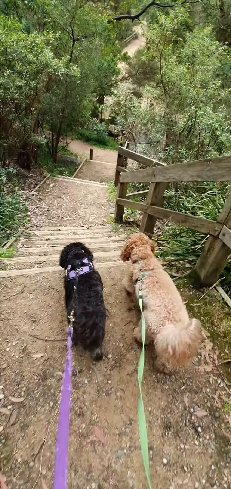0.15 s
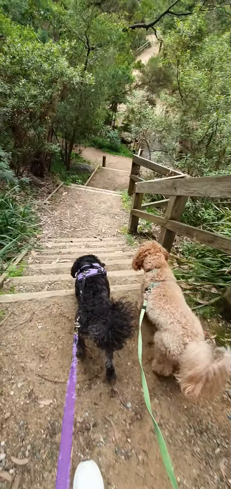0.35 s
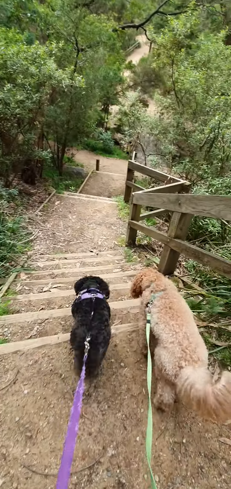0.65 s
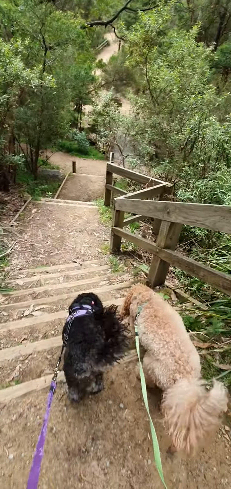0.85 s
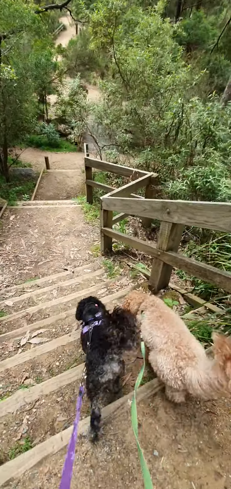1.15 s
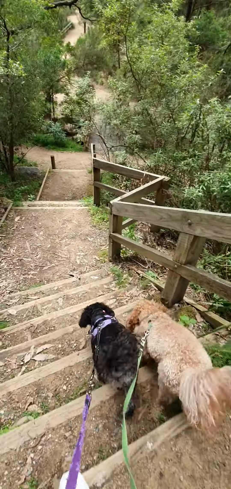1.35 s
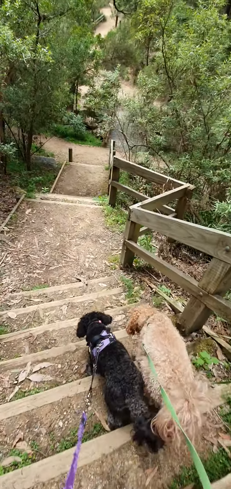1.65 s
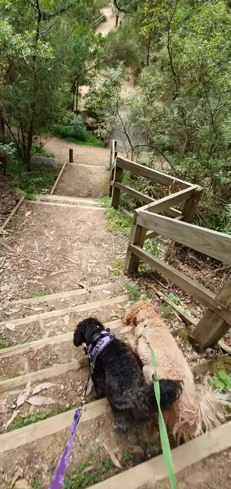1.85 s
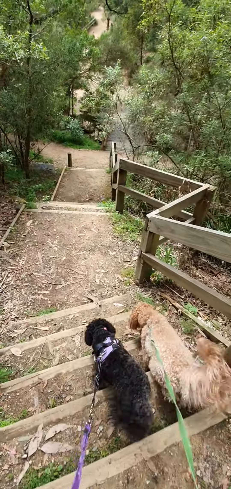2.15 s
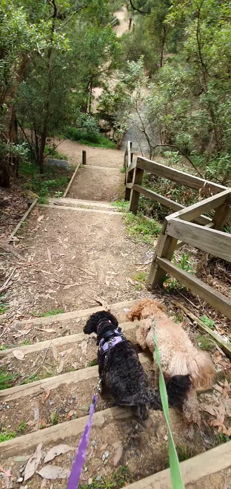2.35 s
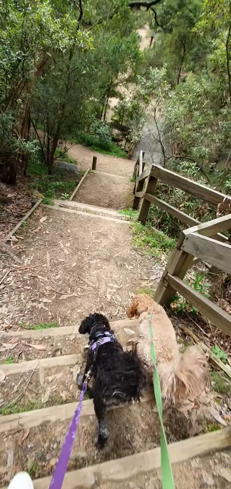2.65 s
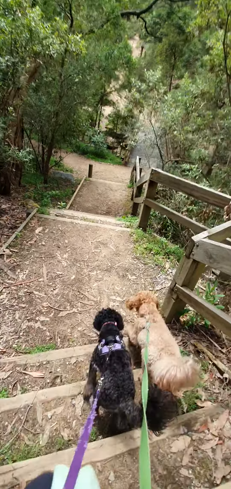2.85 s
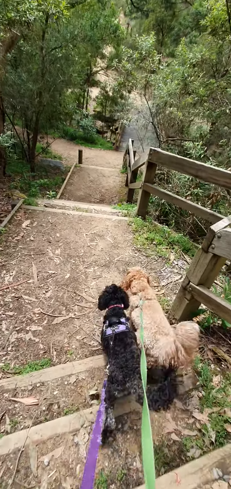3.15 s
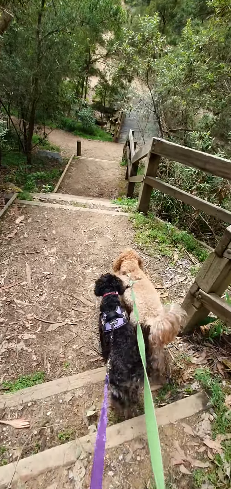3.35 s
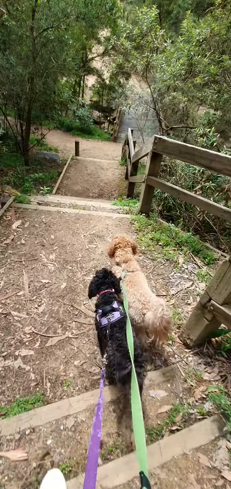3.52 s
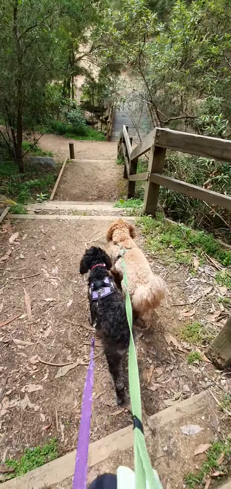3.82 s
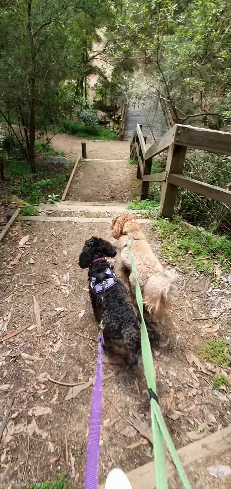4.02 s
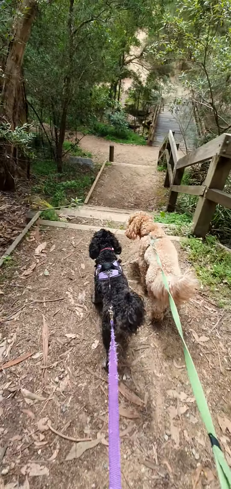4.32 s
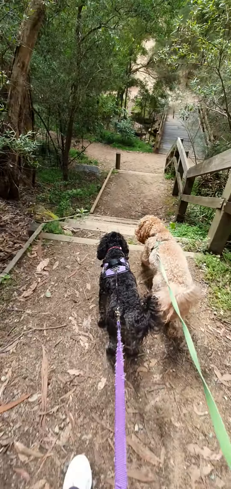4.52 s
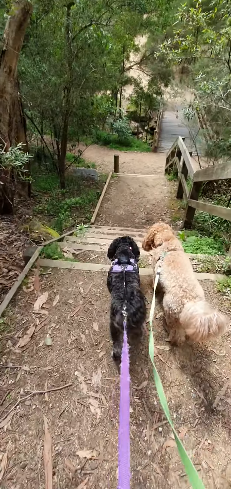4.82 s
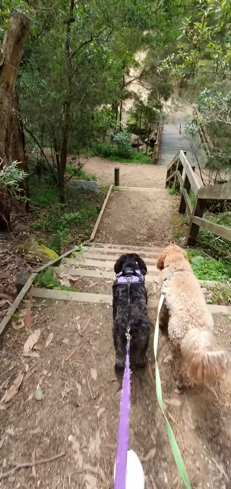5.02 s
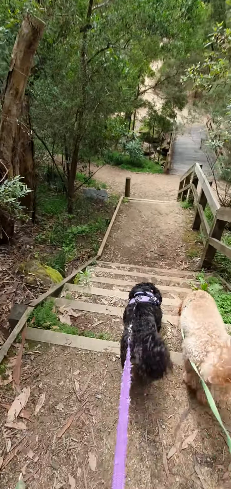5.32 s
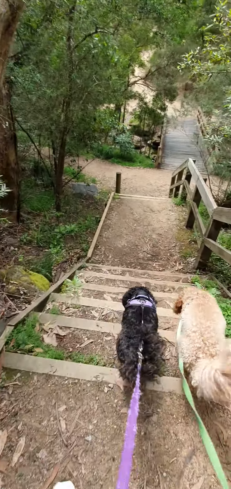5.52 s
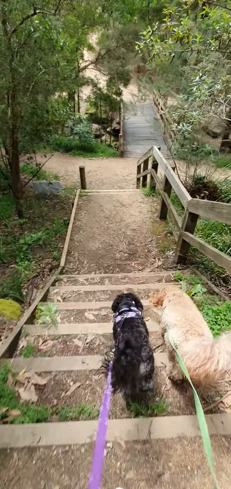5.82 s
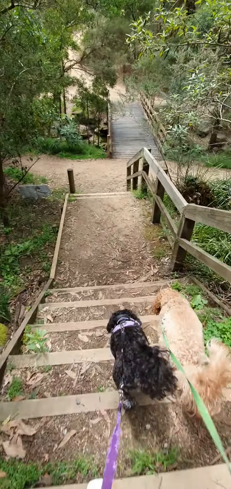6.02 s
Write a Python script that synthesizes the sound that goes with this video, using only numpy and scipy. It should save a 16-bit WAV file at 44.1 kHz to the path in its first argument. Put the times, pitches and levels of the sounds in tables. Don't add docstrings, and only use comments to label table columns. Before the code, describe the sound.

A quiet, open bush hush with light low wind buffeting a handheld stereo microphone, stronger on the right at the start, near 1 s and between 1.5 and 2.2 s. A stone clicks at once; a gritty step crunches at 0.45 s, then loud stone clicks rattle at 0.75-0.8 s and more gravel ticks until 1.5 s. Dull timber thumps fall around 1.9, 2.35, 2.75, 3.15, 3.6 and 4.1 s, with scuffs, paw patter, leaf rustle and dry snaps. Hollow lead-clip knocks cluster from 2.4 to 3.4 s; a sharp stone crack lands at 3.27 s. Softer steps follow at 4.6, 5.15, 5.6 and 6.05 s. Collar tags ring thinly and faintly, near 0.6, 0.9 and 3.45 s. Small birds whistle fast upward glides and high pips throughout, slightly reedy at 1.25 s, echoing briefly among trees.

```python
import sys
import numpy as np
from scipy import signal
from scipy.fft import rfft, irfft, next_fast_len
from scipy.io import wavfile
from scipy.ndimage import uniform_filter1d, map_coordinates

SR = 44100
rng = np.random.default_rng(int(sys.argv[2]) if len(sys.argv) > 2 else 0)


def log_audio(samples):
    frames = np.atleast_2d(samples).T
    limited = np.clip(frames, -1, 1)
    pcm = np.round(limited * 32767).astype(np.int16)
    wavfile.write(sys.argv[1], SR, pcm)


def boost_factor(decibels):
    exponent = np.asarray(decibels, float) / 20
    return 10 ** exponent


N = 272097

# frequency in Hz, level in dB per Hz.
AIR_COLOUR = [(71, 2), (120, 0.5), (150, -5), (272, -3), (1210, -20.5), (2530, -24.5), (5870, -42),
              (7350, -43), (8480, -26.5), (14200, -75), (16000, -60)]
# frequency in Hz, likeness from 0 to 1.
EAR_LIKENESS = [(200, 1), (800, 0.81), (2300, 0.044), (6000, 0.013), (15000, 0.014)]
# frequency in Hz, time to fade by 60 dB in seconds.
TREE_FADE = [(300, .25), (2500, 1.0), (4300, 1.5), (6000, .9), (8000, .6), (14000, .35)]

# frequency in Hz, level in dB per Hz.
WIND_COLOUR = [(20, -55), (35, -8.5), (65, 4.5), (95, -2), (130, -19), (200, -46), (400, -36), (900, -67)]
# time in seconds, level in dB.
BREEZE_LEVEL = [(0, -40), (.3, -50.5), (1.2, -53), (1.8, -48), (2.9, -51.5), (3.6, -56), (4.1, -46),
                (5, -54.5), (5.6, -51), (6.17, -53)]
# peak in seconds, level in dB, half length in seconds,
# flutter in dB against the rumble.
WINDWARD_PUFFS = [(.045, -21.5, 0.015, -4), (.115, -26.5, 0.02, -3), (.17, -24, 0.019, -21),
                  (.62, -40, 0.086, -15), (.99, -17.5, 0.009, -24), (1.022, -18.5, 0.024, -6.5),
                  (1.2, -39, 0.27, -13), (1.47, -27.5, 0.052, -15.5), (1.535, -24, 0.018, -16),
                  (1.63, -30, 0.021, -18), (1.77, -36.5, 0.016, -13), (1.92, -29, 0.03, -10),
                  (2.035, -25.5, 0.059, -15.5), (2.17, -29.5, 0.048, -20.5), (2.69, -36, 0.12, -13.5),
                  (2.8, -29, 0.009, -33), (2.95, -34, 0.08, -11.5), (3.07, -24.5, 0.032, -27),
                  (3.25, -38.5, 0.12, -19), (3.86, -42, 0.071, -38), (4.3, -43, 0.073, -22),
                  (4.815, -24.5, 0.038, -23), (5.3, -60, 0.16, -12), (5.765, -32, 0.023, -29)]
SHELTERED_PUFFS = [(.15, -64, 0.066, -23), (1.41, -38.5, 0.076, -39), (1.54, -48, 0.032, -17),
                   (1.95, -66, 0.073, -6), (2.38, -38, 0.01, 2.5), (2.8, -43, 0.058, -25),
                   (3.21, -43.5, 0.16, -27), (4.28, -32, 0.021, -7.5), (5.76, -45, 0.017, -10)]

# start in seconds, pitch in Hz, level in
# dB, time to fade by 60 dB in seconds.
LINGERING_NOTES = [(.16, 4200, -61, 1.0), (.762, 4145, -57, 0.98), (1.3, 4080, -56, 0.81),
                   (1.45, 4650, -61, 0.97), (1.79, 4960, -62, 1.2), (2.118, 4075, -61, .8),
                   (2.445, 4800, -64, 0.54), (2.538, 4300, -60, .7), (3.138, 4350, -58, .8),
                   (3.425, 1535, -58, .25), (3.769, 4170, -59, 1), (3.912, 1560, -55, 0.16),
                   (4.483, 4250, -59, 0.88), (4.975, 3640, -67, 0.73), (4.965, 2600, -66, 0.83),
                   (5.163, 4220, -73, 0.71), (5.145, 3380, -67, .6), (5.82, 4310, -72, .6),
                   (1.3, 3800, -67, .6), (1.66, 3760, -55, 0.76), (1.885, 3520, -65, .4), (4.47, 3130, -66, .8)]

# start in seconds, length in seconds, start pitch in Hz, overtone level in dB,
# fundamental in dB against the overtone.
BIRD_GLIDES = [(0.1, 0.045, 2420, -50, -5.5), (0.651, 0.041, 2625, -55.5, -15),
               (0.696, 0.045, 2306, -50, -9), (1.305, 0.053, 2570, -58.5, -5),
               (1.747, 0.046, 2094, -57.5, -1.5), (1.855, 0.042, 2710, -53.5, -13),
               (2.067, 0.04, 2403, -56.5, -4.5), (2.388, 0.038, 2503, -57, -4),
               (2.481, 0.037, 2546, -56, -1.5), (3.08, 0.043, 2360, -50.5, -7),
               (3.712, 0.022, 2210, -53, -7.5), (4.425, 0.039, 2310, -53, -8.5),
               (4.929, 0.039, 1920, -64, -0.5), (5.101, 0.048, 2350, -55.5, -7.5),
               (5.758, 0.044, 2480, -54, -7), (6.079, 0.022, 2240, -61.5, -7)]
# start in seconds, start pitch in Hz, level in dB.
BIRD_PIPS = [(.146, 4112, -54.5), (0.749, 3980, -56), (2.105, 3980, -55), (2.432, 4710, -60),
             (2.524, 4200, -48.5), (3.124, 4197, -50), (3.684, 3430, -67), (4.469, 4040, -56),
             (4.962, 3490, -59.5), (5.15, 4200, -56), (5.808, 4260, -61), (6.111, 3690, -65.5)]
# start in seconds, length in seconds, start pitch in Hz,
# end pitch in Hz, level in dB.
SECOND_BIRD = [(1.174, 0.035, 2540, 2990, -62), (1.217, 0.02, 2220, 2534, -58.5),
               (2.495, 0.04, 4300, 5250, -63), (1.601, 0.032, 2125, 2570, -58),
               (1.63, 0.021, 3440, 3590, -62), (1.639, 0.041, 3740, 3970, -63.5),
               (1.749, 0.014, 4750, 4840, -67), (1.774, 0.019, 2970, 3000, -71),
               (4.807, 0.019, 2620, 2440, -76), (2.716, 0.021, 2290, 2780, -62),
               (3.03, 0.056, 5160, 5150, -75), (3.665, 0.044, 2190, 2540, -70.5),
               (3.74, 0.027, 3610, 4300, -53.5)]
REEDY_BIRD = [
    (1.241, 0.0233, 2560, 2995, -56),
    (1.26, 0.0417, 3694, 4080, -59),
]

# start in seconds, peak in dB, upper tones in dB.
COLLAR_TAGS = [(0.2349, -69, 17), (0.617, -43, -14), (0.937, -47, -6), (2.295, -52, 3), (2.603, -53, 9),
               (2.951, -55.5, 15), (3.2545, -57, -8), (3.45, -43, -13), (4.788, -52, -20), (5.493, -67, 11),
               (3.395, -53, -5),
    (4.374, -68, 14),
    (4.86, -59, -18),
]
# pitch in Hz, time to fade by 60 dB in seconds.
TAG_TONES = [(6024, .28), (7050, .035), (10800, .1)]

# start in seconds, peak in dB, pitch in Hz.
STONE_CLICKS = [(.0044, -19.5, 2230), (.4065, -38, 1850), (.434, -28, 2400), (.466, -33, 1610),
                (.612, -43, 2200), (.685, -39, 1990), (.747, -15, 2250), (0.7735, -13.5, 2080),
                (0.7917, -16.5, 2185), (.7984, -25, 2070), (0.9126, -28.5, 2130), (.941, -37, 2120),
                (.991, -27, 2200), (1.398, -26.5, 2430), (4.642, -65, 1930), (5.862, -39, 2870),
                (1.07, -25, 1940), (1.24, -28, 2230), (1.274, -25, 1890), (1.3062, -32.5, 2040),
                (1.3303, -29, 2230), (1.4787, -28, 1880), (2.002, -32, 1770), (2.161, -33, 1750),
                (2.764, -32, 2470), (2.806, -32, 2170), (3.822, -38, 2540), (3.8977, -38, 2300),
                (5.53, -33, 2850), (5.6116, -27.5, 2320), (5.6236, -32, 1870), (5.6531, -43, 1900),
                (6.0525, -29, 2390),
                (.4115, -33, 1880), (.4195, -35, 2470), (.426, -30, 2570), (0.4407, -35, 2400),
                (.4985, -41, 2620), (.9625, -37, 2200), (.968, -39, 2150), (.9725, -35, 1950),
                (.9815, -36, 1950), (1.0055, -38, 1900), (1.056, -35, 2100), (1.064, -41, 2030),
                (1.0815, -33, 1950), (1.156, -38, 2090), (1.391, -28, 2090), (1.419, -29, 2100),
                (1.488, -27, 2250), (3.257, -32, 1870), (3.2703, -20.5, 2150), (3.281, -33, 1910),
                (3.32, -35, 2250), (4.617, -29, 1700), (4.6385, -37, 1680), (5.641, -38, 2200),
                (5.654, -33, 2300), (5.671, -40, 2290), (5.7547, -41, 2840), (6.09, -40, 2200)]
# start in seconds, peak in dB.
DRY_SNAPS = [(0.4673, -39), (0.9133, -47), (0.932, -25), (1.07, -28), (1.242, -28), (1.638, -45),
             (1.665, -44), (1.788, -24), (1.831, -29), (2.225, -49), (2.2967, -33), (2.3265, -28),
             (2.375, -22), (2.6045, -46), (2.952, -21), (2.976, -24), (2.996, -18), (3.64, -22),
             (3.808, -23), (3.98, -29), (4.3755, -35), (5.5184, -20.5), (5.586, -21),
             (1.101, -32),
    (2.748, -40),
    (4.143, -36),
]

# start in seconds, peak in dB,
# clack in dB, crack in dB.
LEAD_AND_TWIG_KNOCKS = [(2.416, -40, -17, -22), (2.44, -35.5, 4, -21), (2.57, -30, 9.5, 13), (2.889, -35, 3, 3),
                        (3.093, -23, 3.5, 5.5), (3.251, -41, -22, -22), (3.267, -41, 9.5, -20),
                        (3.333, -27, 11.5, 16), (3.384, -32.5, 2.5, -1), (3.704, -44, -10, -4),
                        (4.612, -41.5, 8.5, 10), (5.624, -43.5, 5, 5),
                        (3.246, -45, -10, -20),
    (4.5885, -50, 4, 9),
    (4.6045, -43.5, 6, 10),
    (3.821, -64, 8, 16),
]

# start in seconds, peak in dB, pitch in Hz, upper ring in dB.
TIMBER_THUDS = [(0.453, -43.5, 391, 11.5), (1.894, -30.5, 289, -5.5), (2.353, -26.5, 302, -0.5),
                (2.746, -28, 374.5, -11.5), (3.159, -33, 213, 3), (3.605, -35, 266, -1),
                (4.097, -29.5, 306, 1.5), (5.114, -48, 231, -4), (0.999, -37, 255, -13),
                (5.627, -52, 333, -8), (6.016, -42, 430, -19)]
# start in seconds, peak in dB, pitch in
# Hz.
EARTH_THUDS = [(0.109, -43, 292), (0.502, -42, 328), (0.949, -41.5, 385), (0.98, -54, 282),
               (1.374, -45, 626), (4.588, -45, 338), (4.665, -48.5, 452), (5.705, -51.5, 377),
               (5.86, -70, 487), (6.039, -42.5, 710),
               (4.6, -53, 526), (5.631, -48, 420), (5.674, -50, 520), (6.029, -49, 520)]

# time in seconds, level in dB.
PAW_PATTER = [(0, -58), (.31, -59.5), (.55, -62.5), (1.36, -58.5), (1.74, -61), (2.87, -64.5),
              (3.28, -58.5), (3.42, -66.5), (4.62, -64.5), (5.5, -68), (5.67, -57.5), (6.17, -73)]
# peak in seconds, length in seconds, level in dB, gravel in dB
SCUFFED_STEPS = [(-0.01, 0.017, -59, 27), (0.449, 0.053, -50.5, 0.5), (0.961, 0.063, -54.5, 3.5),
                 (1.406, 0.036, -55, -2.5), (1.486, 0.042, -70, 24), (1.999, 0.082, -62.5, -3),
                 (2.175, 0.073, -61, -2), (2.413, 0.084, -56, -7), (2.49, 0.022, -57.5, 6),
                 (2.788, 0.13, -56.5, -3), (3.107, 0.008, -56.5, -24), (3.26, 0.031, -54, -7),
                 (3.396, 0.046, -61, -9), (3.732, 0.16, -62.5, -6), (4.199, 0.12, -61.5, -6),
                 (4.604, 0.019, -50.5, -7.5), (5.159, 0.043, -58.5, -4), (5.627, 0.025, -53.5, -2),
                 (6.046, 0.028, -58.5, -10), (6.102, 0.12, -69, 22),
                 (4.642, 0.051, -58.5, -5),
]
# peak in seconds, length in seconds, level in dB.
LEAF_RUSTLES = [(-0.005, 0.027, -57), (0.48, 0.036, -64.5), (1.068, 0.016, -67), (1.478, 0.027, -62),
                (1.645, 0.028, -61.5), (2.588, 0.068, -61.5), (2.967, 0.041, -64), (3.116, 0.03, -58),
                (3.407, 0.072, -66.5), (3.757, 0.16, -67), (5.173, 0.065, -73), (5.596, 0.041, -65.5),
                (6.144, 0.069, -67),
                (3.244, 0.1, -64.5),
    (3.805, 0.015, -58),
]
# frequency in Hz, level in dB per Hz.
EARTH_COLOUR = [(70, -17), (150, 2), (280, -0.5), (500, -2), (800, -1), (1100, -2), (2500, -25.5)]
GRAVEL_COLOUR = [(500, 0.5), (1000, -9), (1500, 3.5), (2300, 1.5), (3500, -5), (5000, -6.5), (8000, -24),
                 (16000, -59)]
STONE_COLOUR = [(1400, -19.5), (2100, 1), (2800, -5), (3800, -22.5)]
LEAF_COLOUR = [(2500, -1), (4500, 6.5), (6500, 6.5), (7500, 6.5), (9000, 3.5), (13000, -0.5), (15000, -13),
               (15900, -7), (16300, -70)]

AIR_DB, AIR_SWAY_DB = -56.5, 1.5
PUFF_SHAPE, BREEZE_FLUTTER_DB = 1.61, -44
BEAT_RATE, STEADY_LINE = 130, .7
CLIMB_HZ_PER_S, LEVEL_OFF = 24000, .2
PIP_S, PIP_RISE, PIP_SECOND_DB = 0.014, 1.03, -13.5
GLIDE_SWELL_DB, PIP_SWELL_DB = 11, -6
THIRD_DB, FOURTH_DB, FLICKER_DB = -19, -23, 5
NEARER_FROM_S, FAR_UPPER_DB, NEAR_UPPER_DB = 3, -8, 3
REEDY_SECOND_DB = -2.5
REEDY_THIRD_DB, REEDY_FOURTH_DB = -6, -4
VOICE_TOP_HZ = 12500
GLIDE_ECHO_DB, PIP_ECHO_DB, STIR_DB = -2.5, -17, 3
NEAR_LEAVES_DB = -7
TICK_PAN_DB = -5
CLOD_UPPER_DB = -1.5
GRAVEL_DB, GRAVEL_GROWS = -5.5, 2.01
LEAF_DB, LEAF_GROWS = -9, 1.44
STONE_DB = -9
RISE_SHARE, FALL_SHARE = 0.61, 1.066
STEP_LEAF_DB, RUSTLE_GRAVEL_DB = -18.5, -5
PORT_DIP_HZ, PORT_DIP_WIDTH_HZ, PORT_DIP_DB = 7390, 350, -4.5
TOP_HZ, TOP_STEEPNESS = 15750, 60


def unit(x):
    return x / np.sqrt(np.mean(x ** 2) + 1e-20)


def along(points, hz):
    f, v = np.transpose(points)
    return np.interp(np.log(hz + 1), np.log(f + 1), v)


def curves(rows):
    s, *cols = np.transpose(rows)
    return [np.interp(np.arange(N) / SR, s, c) for c in cols]


def wobble(rate):
    knots = rng.standard_normal(int(N * rate / SR) + 4)
    return map_coordinates(knots, [np.arange(N) * rate / SR])


def filtered(x, response):
    m = next_fast_len(N + 8192)
    return irfft(rfft(x, m) * response(np.fft.rfftfreq(m, 1 / SR)), m)[..., :N]


def late(pair, lag_ms):
    lags = np.array([[lag_ms], [0]]) / 1000
    return filtered(pair, lambda hz: np.exp(-2j * np.pi * hz * lags))


def spread(pair, colour, lag_ms):
    def mid_and_side(hz):
        turn = np.arccos(np.clip(along(EAR_LIKENESS, hz), 0, 1)) / 2
        return boost_factor(along(colour, hz)) * [np.cos(turn), np.sin(turn)]

    mid, side = filtered(pair, mid_and_side)
    return unit(late(np.array([mid + side, mid - side]), lag_ms))


def add(out, s, sound, pan_db):
    i = round(s * SR)
    out[:, i:i + len(sound)] += sound * boost_factor([[pan_db / 2], [-pan_db / 2]])


def ring(t, hz, t60, attack):
    return -np.sin(2 * np.pi * hz * t) * boost_factor(-60 * t / t60) * (1 - np.exp(-t / attack))


def swell(peak, rise, fall, shape):
    t = np.arange(0, N + 64, 64) / SR - peak
    bump = np.exp(-np.abs(t / np.where(t < 0, rise, fall)) ** shape)
    return np.interp(np.arange(N) / SR - peak, t, bump)


def echoes(x, t60_scale, size):
    out, step = np.zeros((2, N + 2 * SR)), SR // 3
    for i in range(0, N, step):
        hz, t, z = signal.stft(rng.standard_normal((2, size)), SR, nperseg=256)
        fade = boost_factor(-60 * t / (t60_scale * along(TREE_FADE, hz)[:, None]))
        tail = signal.istft(z * fade, SR, nperseg=256)[1]
        wet = signal.fftconvolve(x[None, i:i + step], tail / np.linalg.norm(tail[0]), axes=1)
        out[:, i:i + wet.shape[1]] += wet
    return out[:, :N]


def quiet_air():
    level = boost_factor(AIR_DB + AIR_SWAY_DB * wobble(3.183))
    return level * spread(rng.standard_normal((2, N)), AIR_COLOUR, lag_ms=0.19)


def port(puffs):
    gains = boost_factor(curves(BREEZE_LEVEL)[0]) * boost_factor([[0], [BREEZE_FLUTTER_DB]])
    for peak, db, half, flutter_db in puffs:
        gains = gains + boost_factor([[db], [db + flutter_db]]) * swell(peak, half, half, PUFF_SHAPE)
    return gains


def wind():
    gains = np.array([port(SHELTERED_PUFFS), port(WINDWARD_PUFFS)])
    noise = rng.standard_normal((2, 2, N))
    low = filtered(noise[0], lambda hz: boost_factor(along(WIND_COLOUR, hz)))
    low = unit(low / np.sqrt(np.abs(uniform_filter1d(low ** 2, size=SR // 18)) + 1e-9))
    lumps = boost_factor(3.2 * np.array([wobble(26), wobble(24.12)]))
    flap = unit(lumps * filtered(noise[1], lambda hz: boost_factor(along(WIND_COLOUR, hz / 2.144))))
    return gains[:, 0] * low + gains[:, 1] * boost_factor(1.0) * flap


def linger():
    out, t = np.zeros((2, N)), np.arange(N) / SR
    beat = STEADY_LINE + np.array([wobble(BEAT_RATE) + 1j * wobble(BEAT_RATE) for _ in range(2)])
    for s, hz, db, t60 in LINGERING_NOTES:
        a, b = round(s * SR), round((s + t60) * SR)
        u = t[a:b] - s
        fade = boost_factor(db - 60 * u / t60) * (1 - np.exp(-u / 0.0035))
        out[:, a:b] += fade * np.real(beat[:, a:b] * np.exp(2j * np.pi * hz * u))
    return late(out, 0.414)


def whistles(calls, swell_db, attack_s, third_db=THIRD_DB, fourth_db=FOURTH_DB, far_db=FAR_UPPER_DB):
    out = np.zeros((2, 2, N + SR))
    for start, end, start_hz, end_hz, first_db, second_db in calls:
        t = np.arange(round((end - start) * SR)) / SR
        u = t / t[-1]
        pitch = start_hz + (end_hz - start_hz) * (u + LEVEL_OFF * u * (1 - u * u))
        phase = 2 * np.pi * np.cumsum(pitch) / SR
        shape = np.sqrt(2) * np.clip(t / attack_s, 0, 1) * np.clip((t[-1] - t) / 0.00037, 0, 1)
        first = boost_factor(first_db + swell_db * (u - .5)) * shape * np.sin(phase)
        add(out[0], start, first, 3.5)
        upper_db = NEAR_UPPER_DB if start > NEARER_FROM_S else far_db
        third_fourth = boost_factor(third_db) * np.sin(3 * phase) + boost_factor(fourth_db) * np.sin(4 * phase)
        upper = np.sin(2 * phase) + boost_factor(upper_db) * np.clip(2 * u, 0, 1) * third_fourth
        add(out[1], start, boost_factor(second_db - 26 * (u - .45) ** 2) * shape * upper, -4.5)
    flicker = boost_factor(FLICKER_DB * np.array([[wobble(140), wobble(140)], [wobble(140), wobble(140)]]))
    return (flicker * out[..., :N]).sum(0)


def birds():
    glide_calls = [(s, s + n, hz, hz + CLIMB_HZ_PER_S * n, db + first_db, db)
                   for s, n, hz, db, first_db in BIRD_GLIDES]
    glides = whistles(glide_calls, swell_db=GLIDE_SWELL_DB, attack_s=0.0055)

    short = [(s, PIP_S, hz, PIP_RISE * hz, db) for s, hz, db in BIRD_PIPS] + SECOND_BIRD
    pip_calls = [(s, s + n, hz, end_hz, db, db + PIP_SECOND_DB) for s, n, hz, end_hz, db in short]
    pips = whistles(pip_calls, swell_db=PIP_SWELL_DB, attack_s=0.0012)

    reedy_calls = [(s, s + n, hz, end_hz, db, db + REEDY_SECOND_DB)
                   for s, n, hz, end_hz, db in REEDY_BIRD]
    reedy = whistles(reedy_calls, swell_db=-4, attack_s=0.0024,
                     third_db=REEDY_THIRD_DB, fourth_db=REEDY_FOURTH_DB, far_db=1.5)

    voices = np.array([reedy, glides])
    reedy, glides = filtered(voices, lambda hz: 1 / (1 + (hz / VOICE_TOP_HZ) ** 16))
    direct = glides + pips + reedy
    sent = boost_factor(GLIDE_ECHO_DB) * (glides + reedy) + boost_factor(PIP_ECHO_DB) * pips
    stir = boost_factor(STIR_DB * np.array([wobble(220), wobble(220)]))
    leaves = boost_factor(NEAR_LEAVES_DB) * echoes(direct.mean(0), t60_scale=0.32, size=SR // 5)
    far_trees = echoes(sent.mean(0), t60_scale=0.67, size=3 * SR // 4)
    return direct + stir * (leaves + far_trees)


def tags():
    out, t = np.zeros((2, N + SR)), np.arange(SR // 3) / SR
    for s, db, upper_db in COLLAR_TAGS:
        gains = boost_factor([0, upper_db, upper_db - 19])
        disc = sum(g * ring(t, hz, t60, t60 * 0.026) for g, (hz, t60) in zip(gains, TAG_TONES))
        add(out, s, boost_factor(db) * disc, -3)
    return late(out[:, :N], .42)


def ticks():
    out, t = np.zeros((2, N + SR)), np.arange(SR // 50) / SR
    thin = signal.butter(2, [6000, 13000], "band", fs=SR)
    for s, db, hz in STONE_CLICKS:
        click = ring(t, hz, 0.0029, 0.00086) + 0.052 * ring(t, hz * 1.06, 0.033, 0.0048)
        add(out, s, boost_factor(db + 8.0) * click, TICK_PAN_DB)
    for s, db in DRY_SNAPS:
        snap = signal.lfilter(*thin, rng.standard_normal(len(t))) * boost_factor(-3.5 - 60 * t / 0.0049)
        add(out, s, boost_factor(db - 14) * snap, rng.normal(0, 3))
    return late(out[:, :N], 0.41)


def knocks():
    out, t = np.zeros((2, N + SR)), np.arange(SR // 16) / SR
    edge = signal.butter(1, [2500, 9000], "band", fs=SR)
    for s, db, clack_db, crack_db in LEAD_AND_TWIG_KNOCKS:
        u = rng.standard_normal(5)
        body = ring(t, 720 * (1 + .04 * u[0]), .012, .004)
        clack = sum(boost_factor(0.28 * v - hz / 700) * ring(t, hz, 0.0026, 0.00062)
                    for hz, v in zip((1460, 1770, 2350, 4300), u[1:]))
        crack = signal.lfilter(*edge, rng.standard_normal(len(t)))
        crack = crack * boost_factor(-60 * t / .016) * (1 - np.exp(-t / .0005))
        add(out, s, boost_factor(db + 23.5) * body, -4)
        hard = boost_factor(db + 13.0 + clack_db) * clack + boost_factor(db + crack_db - 12.5) * crack
        add(out, s + 0.00082, hard, -6)
    return late(out[:, :N], 0.48)


def thuds():
    out, t = np.zeros((2, N + SR)), np.arange(SR // 16) / SR
    soft = [(s, db, hz, CLOD_UPPER_DB) for s, db, hz in EARTH_THUDS]
    for s, db, hz, upper_db in TIMBER_THUDS + soft:
        push = ring(t, hz, .016, .002) + boost_factor(upper_db - 12) * ring(t, 2.1 * hz, .035, .003)
        add(out, s + 0.00296, boost_factor(db + 13.5) * push, -2.2)
    return late(out[:, :N], 0.28)


def grains(rate, scatter_db, smooth):
    hit = rng.random((2, N)) < rate / SR
    size = boost_factor(scatter_db * np.minimum(rng.exponential(size=(2, N)), 4)) * rng.standard_normal((2, N))
    z = signal.stft(unit(hit * size) + smooth * rng.standard_normal((2, N)), nperseg=128)[2]
    patches = uniform_filter1d(rng.standard_normal(z.shape[1:]), size=2, axis=0)
    patches = uniform_filter1d(patches, size=3, axis=1)
    return signal.istft(z * boost_factor(3.5 * unit(patches)), nperseg=128)[1][:, :N]


def scuff(peak, length, db):
    return boost_factor(db)[:, None] * swell(peak, RISE_SHARE * length, FALL_SHARE * length, 2.2)


def grit():
    patter_db, = curves(PAW_PATTER)
    mean_db = patter_db.mean()
    swing_db = patter_db - mean_db
    gravel_db = GRAVEL_DB + GRAVEL_GROWS * swing_db
    leaf_db = LEAF_DB + LEAF_GROWS * swing_db
    level = boost_factor(mean_db + np.array([swing_db, gravel_db, leaf_db]))
    for peak, length, db, stony_db in SCUFFED_STEPS:
        level = level + scuff(peak, length, [db - stony_db / 2, db + stony_db / 2, db + STEP_LEAF_DB])
    for peak, length, db in LEAF_RUSTLES:
        level[1:] += scuff(peak, length, [db + RUSTLE_GRAVEL_DB, db])

    clumps = wobble(70)
    earth = spread(grains(1200, scatter_db=2.4, smooth=.5), EARTH_COLOUR, lag_ms=.32)
    earth = boost_factor(2.8 * clumps) * earth
    gravel = spread(grains(1800, scatter_db=3, smooth=.5), GRAVEL_COLOUR, lag_ms=.36)
    gravel = boost_factor(2 + 1.2 * clumps + 1.5 * wobble(50)) * gravel
    stones = spread(grains(350, scatter_db=3, smooth=.2), STONE_COLOUR, lag_ms=.4)
    gravel = gravel + boost_factor(STONE_DB) * stones
    leaves = spread(grains(3000, scatter_db=2.2, smooth=.8), LEAF_COLOUR, lag_ms=.4)
    leaves = boost_factor(2 + 1.5 * wobble(40) + clumps) * leaves
    return (level[0] * earth + level[1] * gravel + level[2] * leaves) * boost_factor([[-.8], [.8]])


def scene():
    background = quiet_air() + wind() + linger() + birds()
    hits = ticks() + knocks() + thuds()
    near = boost_factor(-11.0) * echoes(hits[1], t60_scale=0.028, size=SR // 8)
    return background + tags() + hits + near + grit()


def band_limit(x):
    return signal.sosfilt(signal.butter(12, 15830, fs=SR, output="sos"), x)


def record(dry):
    def microphone(hz):
        dip_db = PORT_DIP_DB * np.exp(-((hz - PORT_DIP_HZ) / PORT_DIP_WIDTH_HZ) ** 2)
        return boost_factor(dip_db) / (1 + (hz / TOP_HZ) ** TOP_STEEPNESS)

    heard = filtered(dry, microphone)
    return band_limit(heard)


dry = scene()
out = record(dry)
log_audio(out)
```